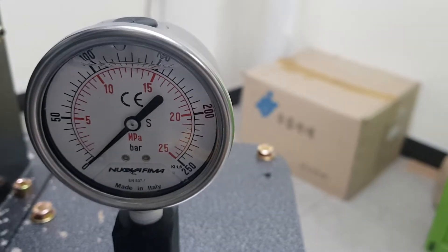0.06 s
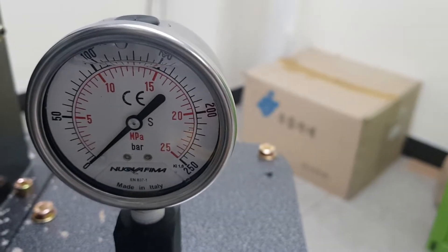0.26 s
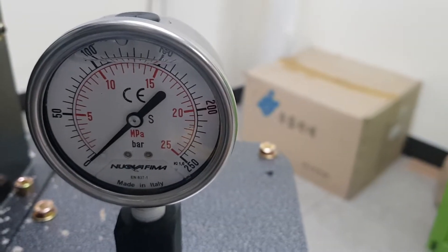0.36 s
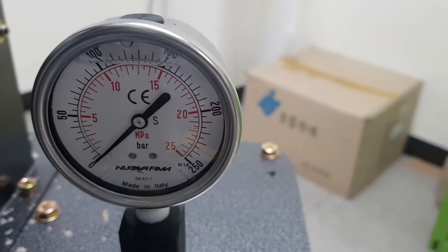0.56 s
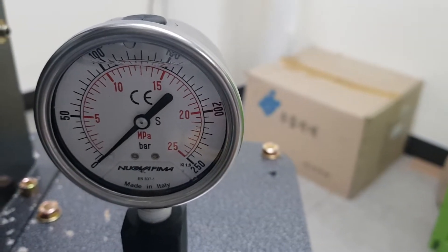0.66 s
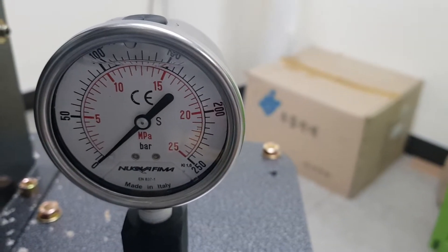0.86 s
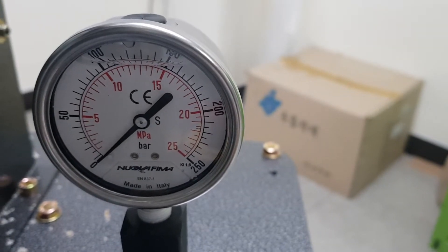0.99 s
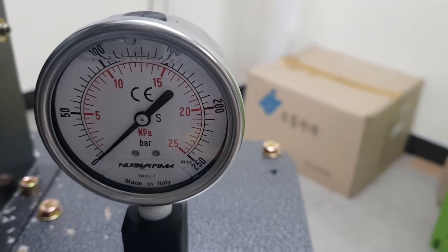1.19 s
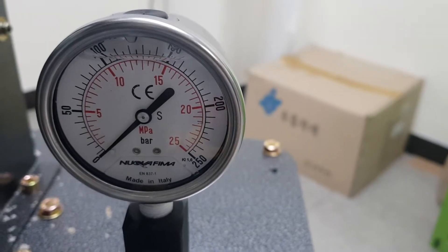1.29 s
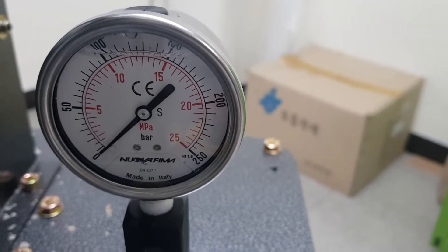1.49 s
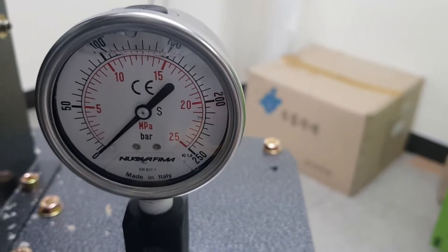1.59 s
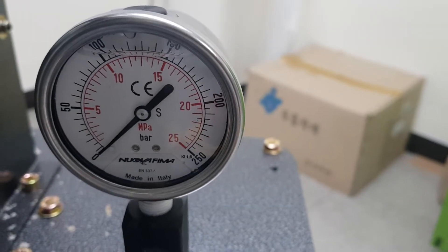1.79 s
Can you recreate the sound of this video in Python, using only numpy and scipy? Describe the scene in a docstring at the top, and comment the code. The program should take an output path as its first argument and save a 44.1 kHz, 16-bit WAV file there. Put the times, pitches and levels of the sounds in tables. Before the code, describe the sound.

Uneven metallic clacks from a small machine, over a faint motor whine and room hum.

```python
"""Small machine with a clacking linkage

A motor idles in a room, whining softly over a low hum. Its steel linkage clacks twice with a
rattle and settles, a catch snaps, and a last clack lands on a stop. The load then changes: the
whine grows brighter and a hiss opens. Each clack is a cluster of contacts that ring the parts
and thump the housing."""
import sys
import numpy as np
from scipy import signal
from scipy.fft import rfft, irfft, next_fast_len
from scipy.io import wavfile
from scipy.ndimage import map_coordinates

SR = 44100
rng = np.random.default_rng(int(sys.argv[2]) if len(sys.argv) > 2 else 0)


def log_audio(samples):
    """Write samples as a 16-bit WAV file to the path given in sys.argv[1]."""
    # one column per channel
    frames = np.atleast_2d(samples).T
    # limit to full scale, then quantise
    limited = np.clip(frames, -1, 1)
    pcm = np.round(limited * 32767).astype(np.int16)
    wavfile.write(sys.argv[1], SR, pcm)


N = 81585

# Linkage hits: start_s, low_db, mid_db, high_db, top_db, chatter_s, ring_db
LINKAGE_HITS = [(0.280, -22, -27, -14, -18, 0.0092, -56), (0.2903, 7.5, 4.5, 1, -3, 0.0038, -19),
                (0.2995, 5, 15.5, -0.5, -2.5, .009, -21.5), (0.311, 7, -1.5, -9, -11.5, 0.017, -21.5),
                (0.492, 7.5, 9.5, 1.5, -5.5, .008, -23), (0.505, 6.5, 10.5, -5, -1.5, 0.013, -19.5),
                (0.529, -2, -8, -7, -22, 0.016, -42), (0.583, 6, -2, -3.5, -14, .015, -41),
                (0.622, 4, 4, -5.5, -18, 0.0049, -36), (0.645, -5.5, -3, -9.5, -18, 0.02, -42)]
# Ring of the steel: pitch_hz, gain_db, t60_s
LINKAGE_MODES = [(325.7, -14.5, 0.36), (677, -8, 0.17), (918, -1, 0.25), (1114, 3, 0.12), (1276, -1, 0.2),
                 (1493, -2, 0.14), (1940, -9, 0.16), (3788, -15.5, 0.19), (4540, -15, 0.076),
                 (9120, -26, 0.17), (11290, -13, .13), (12400, -15, .13), (13530, -22, .17)]
# Dense body resonance: freq_hz, gain_db
LINKAGE_BODY = [(40, -38), (130, -6), (270, 1.5), (480, -3.5), (700, 2), (1200, -0.5), (2050, 6),
                (2700, 1.5), (3600, 1), (5500, -1), (8000, -2.5), (12400, 4.5), (15500, -4.5)]
def linkage():
    """Steel links knock together twice, then rattle to rest."""
    return strikes(LINKAGE_HITS, LINKAGE_MODES, LINKAGE_BODY,
                   body_db=0, room_db=-1.5, right_leads_s=0.00022)


# Catch hits: start_s, low_db, mid_db, high_db, top_db, chatter_s, ring_db
CATCH_HITS = [(1.110, -11, -12, -11, -25, .006, -70), (1.1485, -21, 4, -5.5, -33, 0.0048, -39),
              (1.1533, -3, -3, 1.5, -4, .0015, -24), (1.2985, -15, -2, -15, -21.5, 0.0027, -54)]
# Ring of the catch: pitch_hz, gain_db, t60_s
CATCH_MODES = [(215.5, -10, 0.4), (693, 2, 0.081), (1074, 4, 0.13), (2057, 9, 0.048), (2295, -3, 0.083),
               (3090, 0.5, 0.11), (5080, 0, 0.11), (5840, -6, .06), (7530, 4.5, 0.027), (8500, -16, 0.18)]
# Dense body resonance: freq_hz, gain_db
CATCH_BODY = [(40, -11), (130, -4.5), (270, 2), (600, 9), (900, -5), (1500, 1), (2400, 4), (4300, -6.5),
              (5200, 5.5), (7000, -2.5), (8500, -5), (12000, -6), (15500, -6)]
def catch():
    """The catch snaps: light, tight contacts with little room on them."""
    return strikes(CATCH_HITS, CATCH_MODES, CATCH_BODY, body_db=0, room_db=-9, right_leads_s=0.00043)


# Hits on the stop: start_s, low_db, mid_db, high_db, top_db, chatter_s, ring_db
STOP_HITS = [(1.443, -24, -17.5, -4.5, -5, 0.015, -48), (1.4552, -1.5, 0.5, 3, -6, 0.0052, -23.5),
             (1.464, 0.5, -2.5, -6, -7, 0.0096, -44), (1.505, -9, -13.5, -7, -22, 0.0079, -36.5)]
# Ring of the stop: pitch_hz, gain_db, t60_s
STOP_MODES = [(229.4, 1.5, 0.1), (332, 4.5, 0.122), (560, -6, 0.069), (582, -3, 0.19), (1704, 2.5, 0.16),
              (2252, 0.5, 0.14), (3330, 4, 0.05), (4280, -3, 0.11)]
# Dense body resonance: freq_hz, gain_db
STOP_BODY = [(40, -36), (130, -4.5), (300, -0.5), (470, -0.5), (750, 6), (1100, 2), (1800, 2), (3000, 1),
             (6000, -3.5), (7700, -8.5), (12000, -1.5), (15500, -1.5)]
def stop():
    """The last clack lands on the stop and rings it briefly."""
    return strikes(STOP_HITS, STOP_MODES, STOP_BODY, body_db=1.5, room_db=-2, right_leads_s=0.00016)


# EQ points for a hit's low, mid, high and top: freq_hz
HIT_EQ_HZ = [250, 1000, 3000, 12000]
# Decay of the parts' bodies: freq_hz, t60_s
BODY_DECAY = [(150, 0.17), (1000, .06), (4000, 0.12), (12000, 0.041)]
# Decay of the room: freq_hz, t60_s
ROOM_DECAY = [(100, 0.71), (500, 0.59), (2000, 0.48), (6000, 0.57), (13000, 0.31)]
# Placement of the clacks: freq_hz, left_over_right_db
CLACK_PAN = [(100, 5), (280, 6), (600, 6), (1100, -0.5), (2200, -2.5), (5000, 0), (13000, -0.5)]
def strikes(hits, modes, body, body_db, room_db, right_leads_s):
    """Each contact cracks and chatters into the body, rings the part's modes and echoes in the room."""
    ticks_per_s, crack_db, makeup_db, ring_rise_s = 2200, -5, 10.5, 0.00074
    out, t = np.zeros((2, N)), np.arange(SR // 2) / SR
    ring_attack = 1 - np.exp(-t / ring_rise_s)
    for start_s, *eq_db, chatter_s, ring_db in hits:
        ticks = np.sign(rng.standard_normal(len(t))) * (rng.random(len(t)) < ticks_per_s / SR)
        ticks *= np.exp(-(t / chatter_s) ** 4)
        ticks[0] += 1.5  # the first impact leads the chatter
        ticks /= np.linalg.norm(ticks)
        response = amp(body_db) * tail(BODY_DECAY) + amp(room_db) * tail(ROOM_DECAY)
        response[0, round(right_leads_s * SR)] += amp(crack_db)  # direct crack, later on the left
        response[1, 0] += amp(crack_db)
        chatter = signal.fftconvolve(response, ticks[None])[:, :len(t)]
        eq = list(zip(HIT_EQ_HZ, eq_db))
        clack = coloured(chatter, lambda hz: along(body, hz) + along(eq, hz) + makeup_db)
        for hz, db, t60 in modes:
            phase = 2 * np.pi * rng.random()
            phase += rng.standard_normal((2, 1)) * min(hz / 1000, 2)  # high modes spread wider
            clack += amp(ring_db + db - 60 * t / t60) * ring_attack * np.sin(2 * np.pi * hz * t + phase)
        add(out, start_s, clack)
    return filtered(out, lambda hz: pan(along(CLACK_PAN, hz)))


# Panel thumps: start_s, pitch_hz, level_db, t60_s
THUMPS = [(0.313, 108, -25, 0.12), (0.497, 272.2, -18.5, 0.45), (0.519, 250.6, -12.5, 0.14),
          (0.578, 119, -23.5, 0.12), (0.622, 113, -13, 0.056), (0.63, 85.6, -37, 0.95),
          (1.155, 109, -40, 0.16), (1.457, 150, -37, .12), (1.509, 82.4, -34.5, 0.29)]
def housing(rise_s=0.0083, left_db=6):
    """The heavier blows set the housing's panels thumping."""
    out, t = np.zeros((2, N)), np.arange(SR) / SR
    attack = 1 - np.exp(-t / rise_s)
    for start_s, hz, db, t60 in THUMPS:
        thump = amp(db - 60 * t / t60) * attack * np.sin(2 * np.pi * hz * t)
        add(out, start_s, pan(left_db) * thump)
    return out


# Shaft orders around the load change: multiple, before_db, after_db, left_over_right_db
SHAFT_ORDERS = [(6, -48.5, -51, 2.5), (8, -53.5, -48.5, 2), (12, -51.5, -54, 5.5), (14, -51.5, -58, -3),
                (16, -63, -68, -7), (18, -71, -67, -28), (20, -61, -68, 6), (23, -58, -76, -7),
                (34, -70, -57.5, 6)]
# Whines that come and go: pitch_hz
WHINE_HZ = [382.2, 764.4, 1908, 4199]
# Whine faders: time_s, then one level_db per whine
WHINE_LEVELS = [(0, -54.5, -40.5, -51.5, -71), (.22, -52.5, -37, -48, -55), (.45, -37.5, -38, -59, -68),
                (.7, -58, -62, -52, -57), (1.46, -72, -60, -65, -72), (1.56, -52, -43, -49.5, -45.5),
                (1.7, -52.5, -44, -42, -48.5), (1.85, -52, -45.5, -38.5, -49)]
# Mains hum before the load change: pitch_hz, level_db
MAINS = [(117, -55.5), (236, -54.5)]
def motor(shaft_hz=191.1, wander=0.0007, mains_drop_db=17):
    """Shaft orders, whines and mains hum share one slight drift in pitch."""
    clock = np.cumsum(1 + wander * wobble(12.1)) / SR
    change = load_change()

    def tone(hz, db, flutter_db=3):
        spread = np.array([[-0.5], [0.5]]) * min(hz / 1000, np.pi / 2)
        phase = 2 * np.pi * rng.random() + spread
        peak = np.sqrt(2) * amp(db + flutter_db * wobble(17.66))
        return peak * np.sin(2 * np.pi * hz * clock + phase)

    orders = sum(pan(left_db) * tone(round(k) * shaft_hz, before_db + (after_db - before_db) * change)
                 for k, before_db, after_db, left_db in SHAFT_ORDERS)
    whines = sum(tone(hz, db, flutter_db=0.4) for hz, db in zip(WHINE_HZ, curves(WHINE_LEVELS)))
    mains = sum(tone(hz, db - mains_drop_db * change) for hz, db in MAINS)
    return orders + whines + mains


def load_change(start_s=1.5, rise_s=0.11):
    """Ramps from 0 to 1 as the machine changes its load after the last clack."""
    return np.clip((np.arange(N) / SR - start_s) / rise_s, 0, 1)


# Tone of the hiss: freq_hz, gain_db
HISS_EQ = [(1500, -7), (3000, -14), (4300, 4), (5300, -4), (6500, -3), (7800, -8), (9900, -0.5),
           (10700, -7), (11700, 0), (13000, -8), (15500, -5)]
def hiss(level_db=-43.5):
    """A bright hiss opens with the load change."""
    return amp(level_db) * load_change() * noise_bed(HISS_EQ, flutter_db=0.5)


# Tone of the rush: freq_hz, gain_db
RUSH_EQ = [(40, -10), (90, -3.5), (200, 2), (330, 1), (480, -4), (850, -3.5), (1500, -2.5), (2200, -3.5),
           (3000, -14), (4400, -11.5), (8200, -24.5), (11800, -24.5), (15500, -28)]
# Rush fader: time_s, level_db
RUSH_LEVEL = [(0, -41), (.12, -37), (.25, -31.5), (.47, -30), (.75, -43), (1.45, -55.5), (1.6, -45.5),
              (1.85, -51)]
def motor_rush():
    """The rush of the working motor, fullest around the first two clacks."""
    return amp(curves(RUSH_LEVEL)[0]) * noise_bed(RUSH_EQ, flutter_db=0.8)


# Tone of the room: freq_hz, gain_db
HUM_EQ = [(25, -33), (55, -7.5), (95, 1), (160, -10.5), (330, -1), (480, -7), (680, 1), (1000, -4.5),
          (1400, -7), (1850, -3.5), (2450, -4), (3000, -11), (4600, -11), (7000, -15.5), (8200, -22.5),
          (9800, -24.5), (11600, -17), (12800, -28), (15500, -27)]
# Room hum fader: time_s, level_db
HUM_LEVEL = [(0, -42.5), (.8, -39.5), (1.08, -37.5), (1.25, -37), (1.42, -39.5), (1.85, -38.5)]
def room_hum():
    """A low, noisy room hum sits under everything."""
    return amp(curves(HUM_LEVEL)[0]) * noise_bed(HUM_EQ, flutter_db=-0.06)


# Placement of the noise beds: freq_hz, left_over_right_db
BED_PAN = [(60, 6.5), (380, 3), (700, 0), (2380, -7.5), (8120, -1)]
def noise_bed(eq, flutter_db):
    """Diffuse coloured noise whose level wavers a little."""
    noise = filtered(diffuse(N), lambda hz: amp(along(eq, hz)) * pan(along(BED_PAN, hz)))
    return unit(noise) * amp(flutter_db * wobble(14.56))


# Stereo likeness of the room: freq_hz, correlation
ROOM_CORRELATION = [(60, 0.84), (250, 0.83), (600, 0.45), (1200, 0), (15000, 0)]
def diffuse(n):
    """Stereo noise, alike in the bass and unrelated in the treble."""
    def mid_side_gains(hz):
        angle = np.arccos(np.clip(along(ROOM_CORRELATION, hz), -1, 1)) / 2
        return np.array([np.cos(angle), np.sin(angle)])

    mid, side = filtered(rng.standard_normal((2, n)), mid_side_gains)
    return np.array([mid + side, mid - side])


def tail(t60s):
    """A dense stereo decay of energy 1; each frequency dies at its own speed."""
    n = SR // 2
    hz, t, bands = signal.stft(diffuse(n), SR, nperseg=256)
    decay = amp(-60 * t / along(t60s, hz)[:, None])
    _, x = signal.istft(bands * decay, SR)
    return unit(x[:, :n]) / np.sqrt(n)


def amp(db):
    """Decibels to gain."""
    return 10 ** (np.asarray(db) / 20)


def unit(x):
    """Scale to rms 1."""
    return x / np.sqrt(np.mean(x ** 2) + 1e-20)


def along(points, hz):
    """Read (freq_hz, value) points on a log frequency axis."""
    freqs, values = np.transpose(points)
    return np.interp(np.log(hz + 1), np.log(freqs + 1), values)


def curves(rows):
    """One fader curve for each column after the time."""
    times, *columns = np.transpose(rows)
    return [np.interp(np.arange(N) / SR, times, column) for column in columns]


def wobble(rate):
    """A smooth random curve, rate knots a second."""
    knots = rng.standard_normal(int(N * rate / SR) + 4)
    return map_coordinates(knots, [np.arange(N) * rate / SR])


def pan(left_db):
    """Left and right gains for a level difference."""
    return amp(np.array([[0.5], [-0.5]]) * left_db)


def filtered(x, response):
    """Zero-phase EQ from a gain curve over frequency."""
    n = x.shape[-1]
    size = next_fast_len(n + 8192)
    return irfft(rfft(x, size) * response(np.fft.rfftfreq(size, 1 / SR)), size)[..., :n]


def coloured(x, db_of_hz):
    """Minimum-phase EQ from a dB curve, so nothing rings ahead of a hit."""
    n = x.shape[-1]
    cepstrum = irfft(np.log(amp(db_of_hz(np.fft.rfftfreq(2 * n, 1 / SR)))))
    cepstrum[1:n] *= 2
    cepstrum[n + 1:] = 0
    return irfft(rfft(x, 2 * n) * np.exp(rfft(cepstrum)))[..., :n]


def add(out, start_s, x):
    """Mix x into out from start_s."""
    part = out[:, round(start_s * SR):][:, :x.shape[-1]]
    part += x[..., :part.shape[1]]


def scene():
    """The clacking parts over the running machine and the room."""
    return linkage() + catch() + stop() + housing() + motor() + hiss() + motor_rush() + room_hum()


def record(dry, ceiling=0.9, top_hz=15720):
    """Soft-clip the highest peaks, then cut the very top of the treble."""
    rounded = dry / (1 + np.abs(dry / ceiling) ** 6) ** (1 / 6)
    return filtered(rounded, lambda hz: hz < top_hz)


dry = scene()
out = record(dry)
log_audio(out)
```